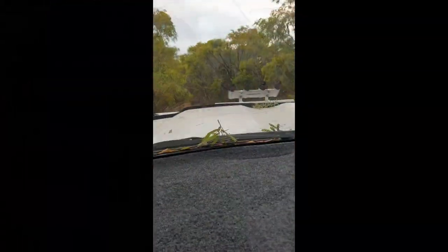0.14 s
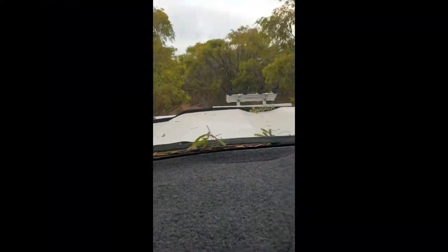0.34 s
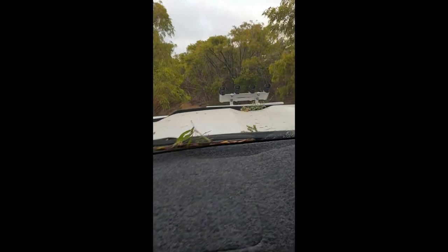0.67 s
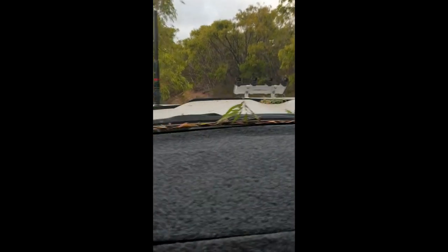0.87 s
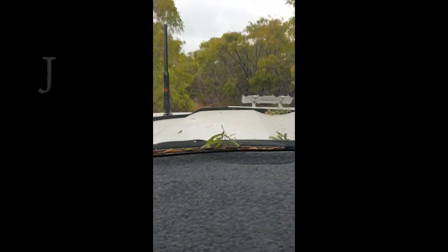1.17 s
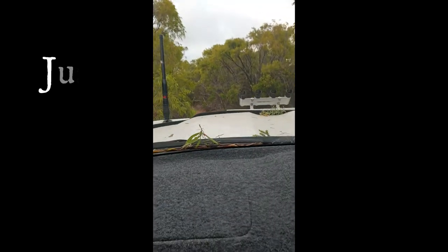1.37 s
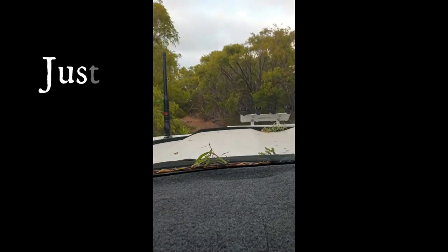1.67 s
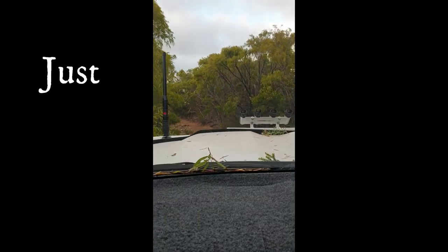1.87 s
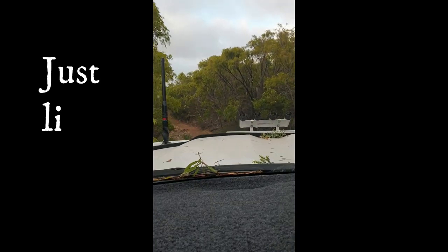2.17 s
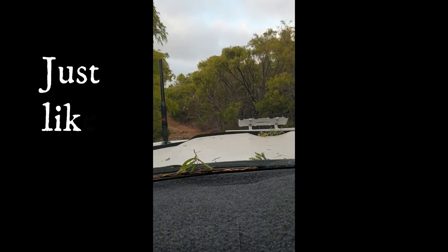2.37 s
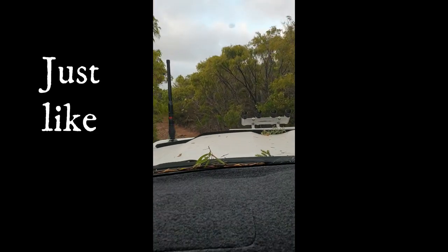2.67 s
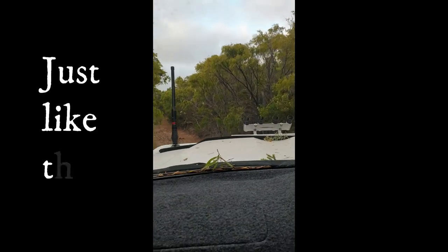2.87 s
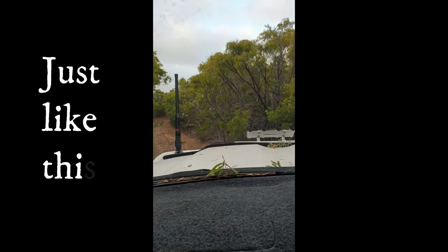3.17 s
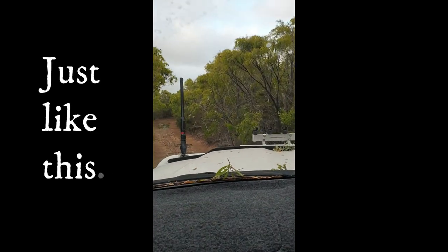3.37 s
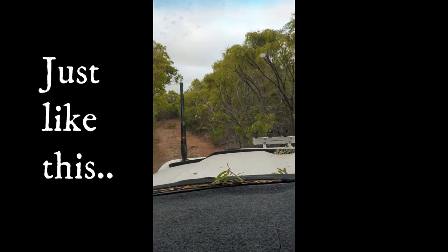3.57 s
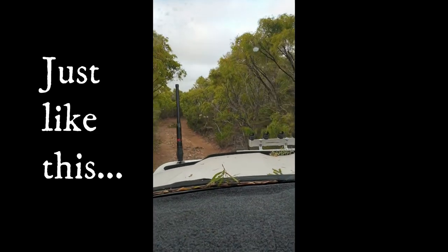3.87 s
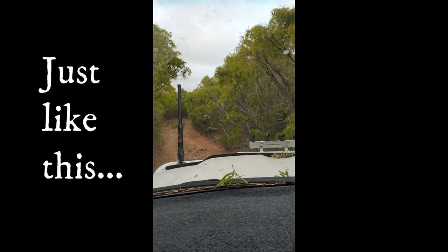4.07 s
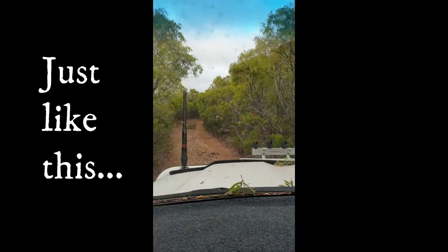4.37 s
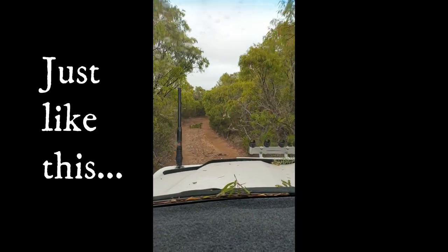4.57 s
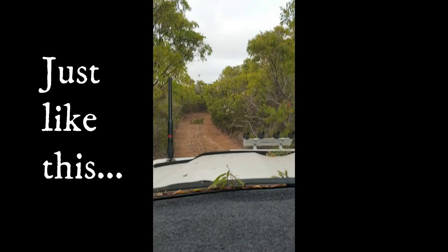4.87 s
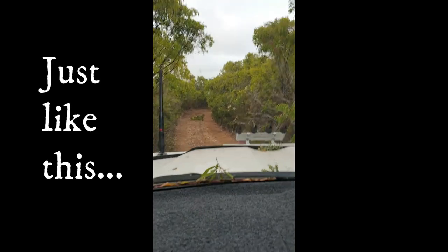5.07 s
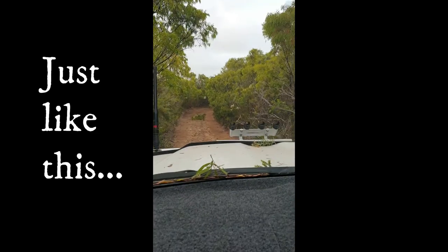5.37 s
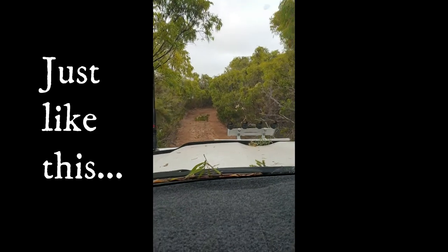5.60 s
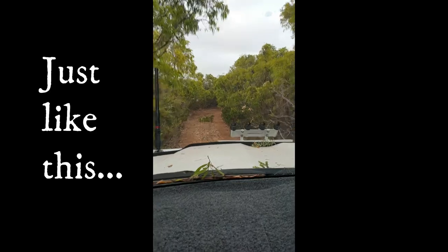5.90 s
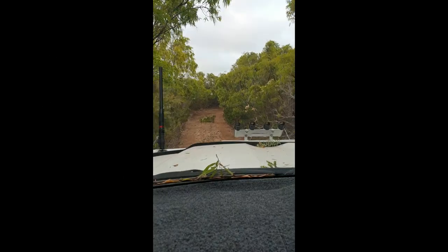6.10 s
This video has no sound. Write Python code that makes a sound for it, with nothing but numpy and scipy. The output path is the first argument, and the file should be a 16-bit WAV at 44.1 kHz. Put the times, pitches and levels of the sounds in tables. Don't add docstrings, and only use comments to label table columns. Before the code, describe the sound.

Close, dry cabin sound in a four-wheel drive on a rough track. A deep engine boom with its octave runs throughout over lumpy low tyre rumble and small panel rattles. Revs climb from 0.3 to about 1.2 seconds, drop by 1.7, surge again around 2.2 to 2.6, then settle to a steady low drone. Branches crack sharply at 0.3, 0.6 and 0.9, with hollow door thumps around 1.1 to 1.2 and the hardest slap near 1.5, amid a jolt and leafy hiss. From 1.7 to 5 only light ticks and thin rustling remain, with a dull thump at 2.3 and a knock and bump at 4.1. A faint high squeak comes at 5.1; from 5.3 shrill screeches build, loudest at 5.4 to 5.7 with a heavy leafy drag, then wavering squeals and low woody groans continue past 6.

```python
import sys
import numpy as np
from scipy import signal
from scipy.fft import rfft, irfft, next_fast_len
from scipy.io import wavfile

SR = 44100
rng = np.random.default_rng(int(sys.argv[2]) if len(sys.argv) > 2 else 0)


def linear_from_db(decibels):
    return 10 ** (np.asarray(decibels, float) / 20)


def dump_mix(stems):
    frames = np.atleast_2d(stems).T
    limited = np.clip(frames, -1, 1)
    pcm = np.round(limited * 32767).astype(np.int16)
    wavfile.write(sys.argv[1], SR, pcm)


N = 275228


def engine():
    # time in seconds,
    # firing rate in Hz, boom in dB.
    revs = [(0.0, 51, -33), (0.3, 50.14, -28.5), (0.52, 67.65, -25.5), (0.73, 72.4, -27),
            (0.9, 86.8, -35.5), (1.01, 94.1, -21), (1.16, 100.1, -30), (1.51, 55.4, -37.5),
            (1.7, 42.1, -45), (1.98, 45.1, -39), (2.19, 58.2, -21.5), (2.38, 83.4, -33.5),
            (2.55, 89.1, -35.5), (2.73, 65.8, -36), (2.85, 52.97, -26), (3.08, 47.05, -29.5),
            (3.3, 56.8, -26), (3.62, 51.5, -29),
            (4.18, 51.0, -25)]
    # frequency in Hz, level in dB.
    octave_response = [(85, -38.5), (105, -40.5), (135, -33), (170, -56.5), (200, -37)]
    hz, boom_db = in_time(revs)
    octave_db = at_hz(octave_response, 2 * hz)
    turn = 2 * np.pi * np.cumsum(hz * (1 + 0.0263 * drift(9.06))) / SR
    boom = linear_from_db(boom_db + 1.97 * drift(10.5)) * np.sin(turn)
    octave = linear_from_db(octave_db + 1.8 * drift(9) + 1.1 * drift(3.2)) * np.sin(2 * turn + 0.8)
    crank = linear_from_db(boom_db - 18.5 + 1.4 * drift(11.4)) * np.sin(1.5 * turn)
    return np.sqrt(2) * (boom + octave + crank)


def slaps():
    # time in seconds, bright peak in dB, weight as dull part re bright in dB,
    # left-right balance in dB.
    hits = [(0.181, -39, -21, 2), (0.2701, -27, 2.5, 1), (0.5842, -20, -7, 1), (0.79, -45, -29, 7),
            (0.896, -31, -2.5, 1.5), (0.971, -29, 3, 0.5), (1.0882, -32, 7.5, 2), (1.1794, -32, 8, 0),
            (1.4879, -19.5, -2.5, -2.5), (1.6593, -33.5, -21, 0.5), (1.8352, -46.5, 18.5, -1),
            (2.0669, -53.5, 25.5, 1), (2.482, -49, -10, -6), (2.745, -40.5, 0, 0),
            (2.798, -39.5, 1.5, -0.5), (2.8912, -37, -6, 3.5), (3.1742, -44.5, -5, -1),
            (3.4659, -49, -10, -7), (3.699, -57, 23.5, -1), (3.812, -42, 8, 1), (3.9794, -40.5, -11, -4),
            (4.083, -38, 8.5, 5), (4.3164, -49, 8, -13), (4.7007, -52, 17, 6), (2.03, -47, -10, 0),
            (5.0043, -42.5, 4, 1), (5.167, -43, -17, -3), (5.4854, -56, 13, 10), (3.2326, -47.5, -6, -8),
            (3.3594, -51, -8, -7)]
    t60_s = 0.15
    white, out = rng.standard_normal((2, N)), np.zeros((2, N))
    bands = []
    for edges_hz in [(300, 1480), (1300, 3170), (4000, 6900), (7600, 15000)]:
        band_pass = signal.butter(2, edges_hz, "band", fs=SR, output="sos")
        bands.append(rms_one(signal.sosfilt(band_pass, white)))
    rises_s = (0.0027, 0.00047, 0.00084, 0.00013)
    lengths = (1.17, 0.86, 1.07, 0.89)
    t = np.arange(int(.3 * SR)) / SR
    for s, peak_db, dull_db, pan_db in hits:
        span = slice(round(s * SR), round(s * SR) + len(t))
        middle_db = -0.5 - 0.0938 * (peak_db + 46)
        top_db = -9.5 + 0.7364 * (peak_db + 29) - 0.041 * dull_db
        hit_t60_s = t60_s * linear_from_db(0.2445 * (peak_db + 17.5))
        levels_db = (dull_db, middle_db, 0, top_db)
        for band, rel_db, rise, longer in zip(bands, levels_db, rises_s, lengths):
            hiss = linear_from_db(-60 * t / (hit_t60_s * longer))
            crack = 0.71 * np.exp(-t / 0.0023)
            envelope = (1 - np.exp(-t / rise)) * (hiss + crack) * linear_from_db(peak_db + rel_db - 9.0)
            out[:, span] += panned(band[:, span] * envelope, np.array([pan_db]))
    return out


def knocks():
    # time in seconds, peak in dB, pitch in Hz, t60 in seconds.
    thumps = [(0.096, -24, 184, 0.075), (0.271, -28, 173, 0.27), (1.087, -41, 1520, .04),
              (1.113, -25, 855, 0.056), (1.112, -34.5, 2890, 0.054), (1.195, -19, 650, 0.04),
              (1.376, -27.5, 787, 0.056), (1.491, -26, 208, .12), (1.541, -26, 453, 0.064),
              (1.57, -28, 710, 0.031), (2.263, -31, 232.6, 0.19), (4.082, -23, 423, 0.05),
              (4.085, -29, 966, 0.032), (4.334, -36, 696, 0.031), (5.495, -29.5, 233, 0.24)]
    out, t = np.zeros(N), np.arange(int(.3 * SR)) / SR
    for s, peak_db, hz, t60 in thumps:
        ring = np.sin(2 * np.pi * hz * t) + 0.27 * np.sin(2 * np.pi * 1.43 * hz * t)
        envelope = linear_from_db(peak_db - 60 * t / t60) * (1 - np.exp(-t / 0.003))
        out[round(s * SR):][:len(t)] += ring * envelope
    return out


def squeals(rows, waver, chatter_db, upper_db):
    second_strand_db, strand_spread = -5.5, 1.4
    out = np.zeros((2, N))
    for s, length, from_hz, to_hz, level_db in rows:
        start = round(s * SR)
        t = np.arange(start, min(start + SR // 4, N)) / SR
        size = len(t)
        edge = stroke(t, s, length, attack=0.014, release=0.02)
        glide_hz = np.interp(t, [s, s + length], [from_hz, to_hz])
        for strand in range(2):
            hz = glide_hz * (1 + strand * strand_spread * waver * (1.3 + drift(12.3, size)))
            wobble = waver * (0.3037 * drift(55, size) + drift(270, size))
            turn = 2 * np.pi * np.cumsum(hz * (1 + wobble)) / SR
            for k, db in enumerate([0] + upper_db, start=1):
                grip_db = level_db + db + strand * second_strand_db + chatter_db * drift(128, size)
                for port in range(2):
                    tone = np.sin(k * turn + rng.uniform(0, 2 * np.pi)) * (k * hz < 15500)
                    out[port, start:start + size] += linear_from_db(grip_db + 1.44 * drift(46, size)) * tone * edge
    return out


def road():
    # time in seconds, level in dB.
    roughness = [(0.0, -43), (0.01, -49.5), (0.47, -52), (0.53, -45), (0.83, -52), (1.18, -39), (1.47, -43),
                 (1.55, -36), (1.65, -47.5), (2.23, -52.5), (2.26, -42.5), (2.91, -55.5), (3.88, -50),
                 (4.07, -53.5), (4.08, -36.5), (4.16, -53), (5.34, -49.5), (5.45, -53.5)]
    # frequency in Hz, density in dB per Hz.
    rumble_colour = [(12, -16), (20, -6.5), (43, -2), (67, 0.5), (80, 1.5), (102, -4.5), (137, -3.5),
                     (210, -21.5), (260, -49.5), (340, -76), (570, -120)]
    drone_colour = [(120, -11), (200, 1), (330, -0.5), (500, -5.5), (800, -8), (1300, -17), (2200, -31.5)]
    rumble_db, drone_db = -34.5, -48.5
    rough_db, = in_time(roughness)
    rough_db = rough_db - rough_db.mean()
    shaking = coloured(rng.standard_normal((2, N)), rumble_colour)
    rumble = linear_from_db(rumble_db + 0.86 * rough_db + 2.2 * drift(15)) * shaking
    drone = linear_from_db(drone_db + rough_db + 1.5 * drift(20)) * coloured(grains(2.5, .006), drone_colour)
    return rumble + drone + pings(drone_db + rough_db - 4.5, per_s=200)


def pings(level_db, per_s):
    sizes = linear_from_db(5.7 * np.minimum(rng.exponential(1, N), 4)) * rng.choice([-1, 1], N)
    born, dealt = rng.random(N) < per_s / SR, rng.integers(0, 16, N)
    out = np.zeros((2, N))
    for k, hz in enumerate(np.geomspace(280, 3000, 16)):
        r, w = linear_from_db(-60 * hz / (22.0 * SR)), 2 * np.pi * hz / SR
        clicks = sizes * born * (dealt == k) + 1e-18
        ring = signal.lfilter([0, np.sin(w)], [1, -2 * r * np.cos(w), r * r], clicks)
        out += panned(ring * linear_from_db(-3.0 * np.log2(hz / 280)), rng.normal(0, 5.1, 1))
    return linear_from_db(level_db) * rms_one(out)


def brush():
    # time in seconds, level in dB.
    foliage = [(0.0, -62.5), (0.71, -63.5), (0.96, -60.5), (1.09, -59), (1.36, -53), (1.49, -55),
               (1.65, -60), (1.96, -65), (2.3, -62), (3.04, -63), (3.26, -64), (3.44, -71), (3.7, -67),
               (3.99, -63), (4.15, -63), (4.52, -63.5), (4.71, -61), (5.3, -64.5)]
    # start in seconds, length in seconds, level in dB,
    # leafiness as bright part re dull in dB.
    boughs = [(1.544, 0.049, -50.5, -20), (2.31, 0.086, -58, -13), (3.073, .11, -68.5, 4.5),
              (4.505, 0.12, -53.5, -15), (4.719, 0.03, -69.5, 15.5), (4.852, 0.07, -53, -12),
              (5.013, 0.042, -69.5, 12), (5.497, 0.076, -34.5, -4), (5.561, 0.094, -41.5, -6.5),
              (5.625, 0.12, -41, -9), (5.793, 0.11, -53, 2), (5.966, 0.13, -48.5, -13),
              (6.127, .14, -45, -24)]
    # frequency in Hz, density in dB per Hz.
    scrub_colour = [(500, 5), (900, 0.5), (1400, 3.5), (2000, 3.5), (3000, -4.5), (4300, -6.5), (6000, -27)]
    rustle_colour = [(2200, -4.5), (3500, -3), (4800, 2.5), (6500, 7), (7300, -0.5), (8200, -38),
                     (10000, -40)]
    top_colour = [(6000, -9), (8000, -4), (10000, -1), (12000, -1), (14000, -5.5), (16000, -5)]
    thick_db, = in_time(foliage)
    thick_db = thick_db - thick_db.mean()
    t = np.arange(N) / SR
    leaf_share = np.array([[0], [1], [1.6]])
    drag = np.zeros((3, N))
    for s, length, db, leafy_db in boughs:
        drag += linear_from_db(db + leafy_db * leaf_share) * stroke(t, s, length, attack=0.012, release=0.024)
    contact, flutter = grains(1.7, 0.012), drift(12.3)
    scrub = linear_from_db(-59.5 + 1.28 * thick_db) + drag[0]
    scrub = scrub * linear_from_db(1.43 * flutter + 1.3 * drift(6.5)) * coloured(contact, scrub_colour)
    rustle = linear_from_db(-62.5 + thick_db) + drag[1]
    rustle = rustle * linear_from_db(1.0 * flutter) * coloured(contact, rustle_colour)
    top = linear_from_db(-68.5 + 1.15 * thick_db) + linear_from_db(-3) * drag[2]
    top = top * linear_from_db(2.9 * flutter) * coloured(contact, top_colour)
    return scrub + rustle + top


def cabin(x):
    t60_s, trim_cut_hz = 0.11, 11900
    size = next_fast_len(N + SR // 2)
    w = 2 * np.pi * np.arange(size // 2 + 1) / size
    dull = 1 / (1 + 1j * w * SR / (2 * np.pi * trim_cut_hz))
    sides = np.zeros((2, len(w)), complex)
    for side, lags in enumerate(rng.uniform(.003, .014, (2, 6)) * SR):
        for k, lag in enumerate(lags):
            loop = dull * linear_from_db(-60 * lag / SR / t60_s)
            sides[side] += (-1) ** k / (1 / loop * np.exp(1j * w * lag) - 1)
    return irfft(rfft(x, size) * sides, size)[:, :N]


def later_left(x):
    n = np.arange(N)
    return np.array([np.interp(n - .00025 * SR, n, x[0]), x[1]])


def stroke(t, start, length, attack, release):
    return np.clip(np.minimum((t - start) / attack, (start + length - t) / release), 0, 1) ** 2


def grains(spread_db, smear_s):
    jumps = linear_from_db(spread_db * np.minimum(rng.exponential(1, N), 5)) * (rng.random(N) < 260 / SR)
    contact = signal.lfilter([1], [1, -np.exp(-1 / (smear_s * SR))], jumps)
    return rng.standard_normal((2, N)) * np.sqrt(2.0 + contact)


def coloured(source, spectrum):
    # frequency in Hz, likeness 0-1.
    likeness = [(60, 0.97), (150, 1), (300, 0.86), (600, 0.31), (1200, 0.014), (8000, 0.016)]
    size = next_fast_len(N)
    hz = np.maximum(np.arange(size // 2 + 1) * SR / size, 1)
    alike = np.clip(at_hz(likeness, hz), 0, 1)
    inside = (hz > spectrum[0][0]) & (hz < spectrum[-1][0])
    mid, side = rfft(source, size) * linear_from_db(at_hz(spectrum, hz)) * inside
    mid, side = mid * np.sqrt(1 + alike), side * np.sqrt(1 - alike)
    return rms_one(irfft([mid + side, mid - side], size)[:, :N])


def drift(rate, size=N):
    r = np.exp(-16 * np.pi * rate / SR)
    noise = rng.standard_normal(size // 8 + 4002)
    slow = signal.lfilter([1], [1, -2 * r, r * r], noise)[4000:]
    return np.interp(np.arange(size) / 8, np.arange(len(slow)), rms_one(slow - slow.mean()))


def rms_one(x):
    return x / np.sqrt(np.mean(x ** 2) + 1e-20)


def in_time(rows):
    s, *columns = np.transpose(rows)
    return [np.interp(np.arange(N) / SR, s, c) for c in columns]


def at_hz(points, hz):
    point_hz, value = np.transpose(points)
    return np.interp(np.log(hz), np.log(point_hz), value)


def panned(x, pan_db):
    return x * linear_from_db(np.array([pan_db / 2, -pan_db / 2]))


def scene():
    # start in seconds, length in seconds, slip rate from in Hz,
    # slip rate to in Hz, level in dB.
    frayed = [
        (5.315, .13, 4164, 4340, -37),
        (5.43, .2, 4273, 4138, -31.5),
        (5.565, .07, 3820, 3780, -31.5),
        (5.795, 0.055, 3040, 3480, -39),
        (5.9, .14, 4220, 3736, -41),
    ]
    thin = [
        (5.09, .11, 7380, 7140, -49),
        (5.645, 0.081, 4510, 4410, -42),
        (5.7, 0.13, 4416, 3600, -37.5),
        (5.8, .07, 3700, 4344, -43),
        (5.855, 0.16, 4520, 3693, -43.5),
        (6.015, 0.092, 4710, 4603, -42.5),
        (6.165, 0.096, 4383, 4460, -45.5),
    ]
    thick = [(5.49, 0.038, 1452, 1305, -31), (5.51, 0.045, 1297, 1267, -33.5), (5.55, .2, 1306, 1235, -42),
             (5.62, 0.11, 811, 791, -41), (5.8, 0.054, 1610, 1503, -47), (5.83, .1, 1177, 1112, -38),
             (5.91, .16, 1113, 1191, -38), (6.07, 0.1, 1155, 1165, -36.5), (6.13, 0.078, 1013, 780, -42),
             (6.02, 0.052, 640, 640, -43.5), (6.15, 0.1179, 699, 691, -36),
             (6.16, 0.089, 1288, 1344, -45.5)]
    twigs = (squeals(frayed, waver=.021, chatter_db=2.5, upper_db=[-18.0, -21.0])
             + squeals(thin, waver=.007, chatter_db=5.5, upper_db=[-19.0, -27.0])
             + squeals(thick, waver=0.0139, chatter_db=3.5,
                       upper_db=[-11.5, -25.0, -26.0, -27.0, -24.0, -39.0]))
    contacts = twigs + slaps()
    scraped_side = later_left(linear_from_db(0.5) * contacts + linear_from_db(-8.5) * cabin(contacts))
    return engine() + road() + brush() + knocks() + scraped_side


def roll_off(x):
    return signal.sosfilt(signal.butter(12, 16320, fs=SR, output="sos"), x)


def record(dry):
    # frequency in Hz, left-right in dB.
    port_balance = [(60, 0.0), (120, 0.5), (240, 1.5), (480, 1.5), (950, -5), (1890, -3), (3770, -9),
                    (7520, -7.5), (15000, 4.5)]
    top_cut_hz = 15840
    size = next_fast_len(N)
    hz = np.maximum(np.arange(size // 2 + 1) * SR / size, 1)
    ports = panned(rfft(dry, size) * (hz < top_cut_hz), at_hz(port_balance, hz))
    return roll_off(irfft(ports, size)[:, :N])


dry = scene()
out = record(dry)
dump_mix(out)
```